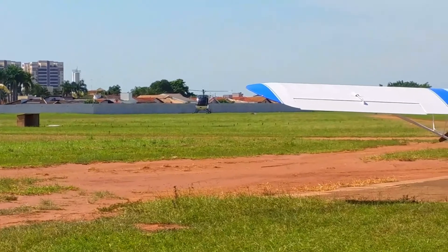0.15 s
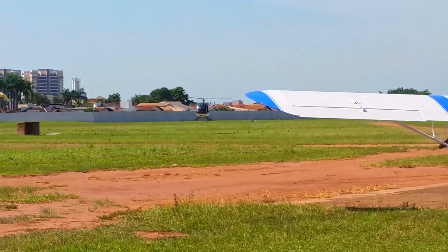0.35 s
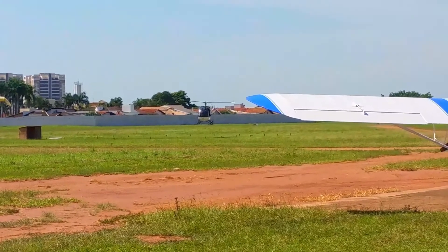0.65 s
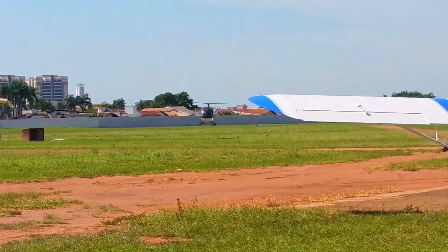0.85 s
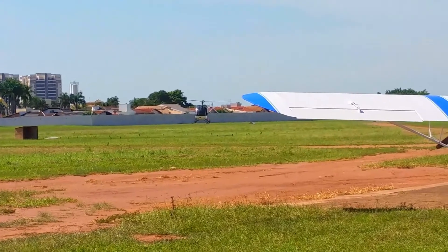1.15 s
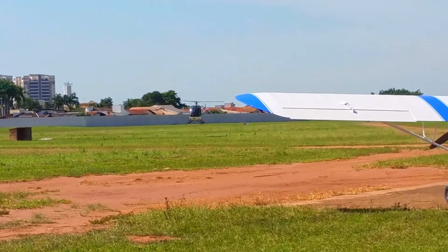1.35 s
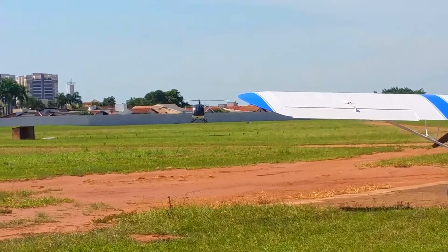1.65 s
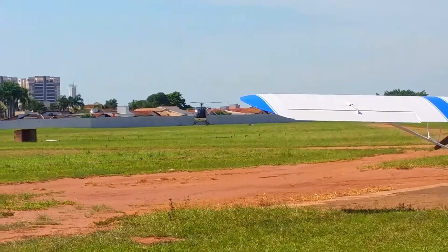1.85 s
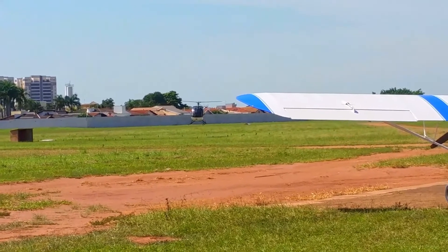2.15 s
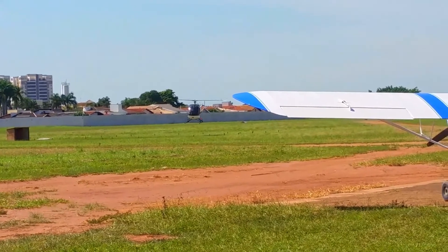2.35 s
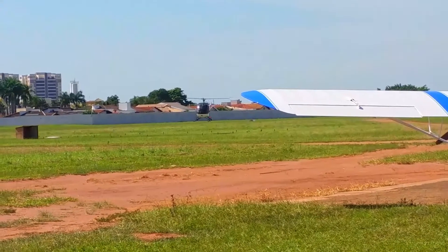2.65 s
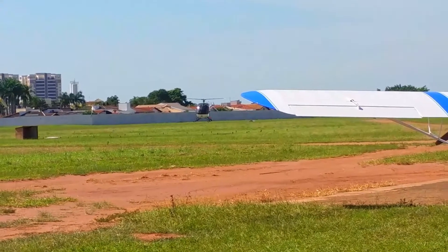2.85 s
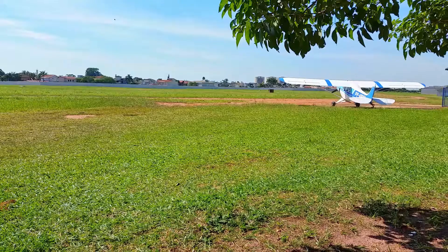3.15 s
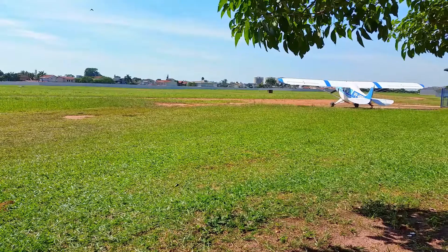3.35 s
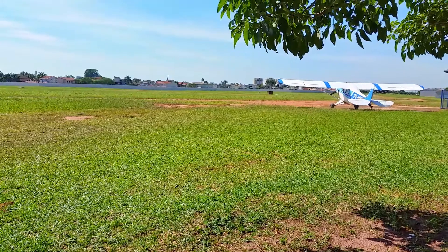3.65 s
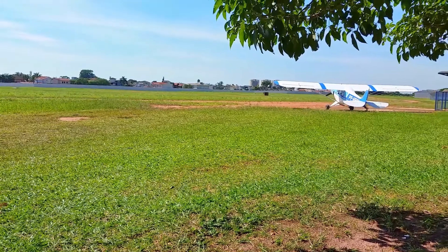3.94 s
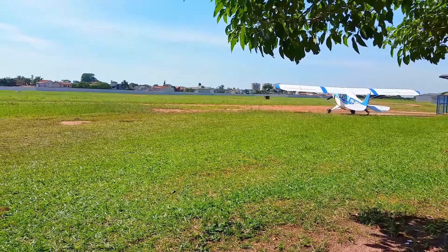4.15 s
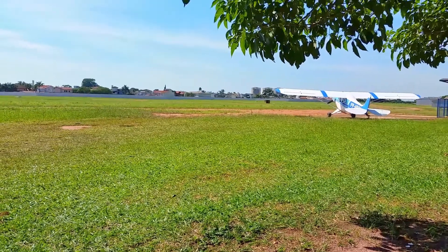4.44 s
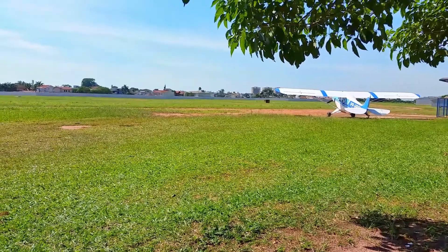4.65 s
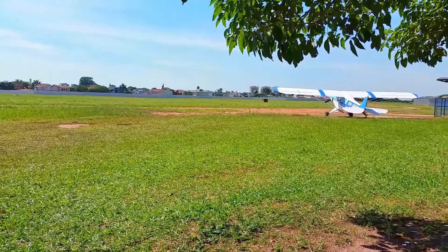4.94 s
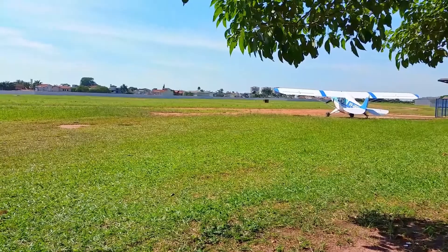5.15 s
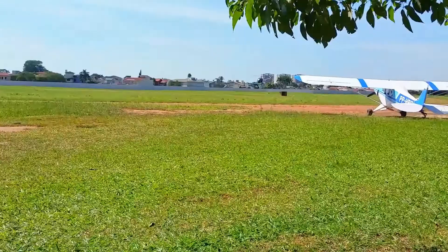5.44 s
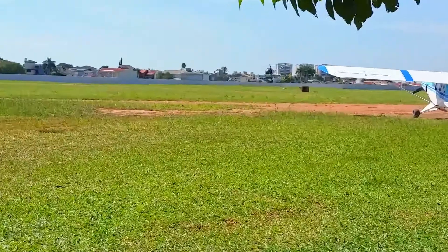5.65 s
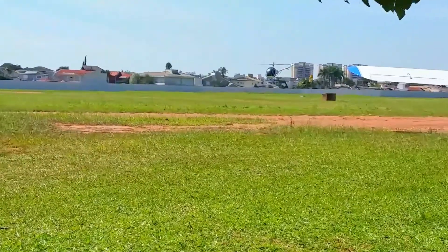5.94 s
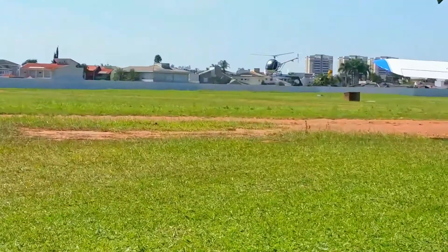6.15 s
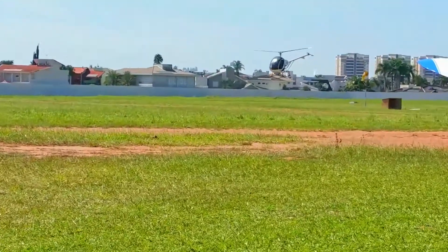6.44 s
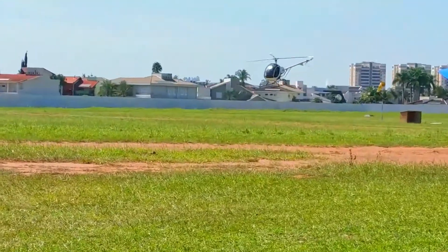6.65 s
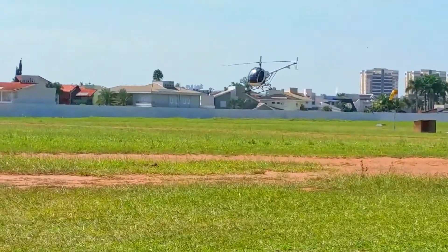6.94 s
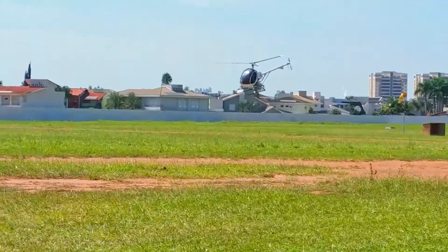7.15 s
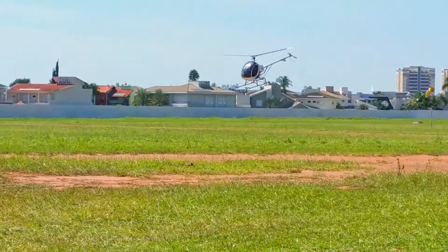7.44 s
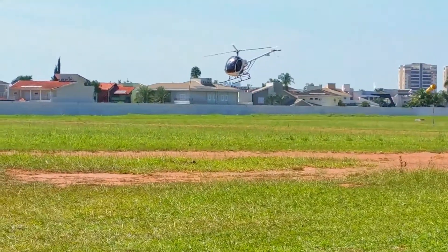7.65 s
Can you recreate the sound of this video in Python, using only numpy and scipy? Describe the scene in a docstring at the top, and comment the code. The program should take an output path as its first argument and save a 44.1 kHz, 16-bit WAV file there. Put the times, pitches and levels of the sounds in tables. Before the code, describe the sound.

From 0 to about 3.1 seconds, a small piston helicopter hovers far across an open airfield. A low, steady engine drone beats against a smooth tail-rotor hum; rapid main-blade slaps, around twenty-three a second, knock dully and are strongest near 0.8-1.2 seconds. Chopped air swishes softly above a wide low rumble, and small birds give faint short chirps, some raspy. At 3.1 the sound cuts off abruptly, leaving silence until 3.4. Then the helicopter fades in by 3.7, closer and rougher, with a bright initial surge: dense exhaust barks, crackling gas and thin high ringing over the drone. It eases around 4.5, then grows from 5.2 onward, with treble flares near 5.3, 6.0, 6.2 and 7.4. Deep tones swell separately, hiss flutters, and a few faint chirp-like blips appear. It remains loud to the end near 7.8, without fading away.

```python
"""A deep beating drone with slapping blades: a light piston helicopter hovers far across an airfield.
Four-cylinder exhaust lines beat against the tail rotor's hum, three main blades slap and swish as filtered
clicks and gated noise, wake noise rumbles low, and small birds chirp faintly as gliding sines.
The hover is cut off; after a short silence the climb fades in, closer to the microphone, and the exhaust
barks: coloured clicks and crackling noise at every firing, with high ringing lines and treble flares."""
import sys
import numpy as np
from scipy import signal
from scipy.fft import rfft, irfft
from scipy.io import wavfile
from scipy.ndimage import uniform_filter1d

SR = 44100
rng = np.random.default_rng(int(sys.argv[2]) if len(sys.argv) > 2 else 0)


def wrap_up_sound(samples):
    """Save the sound to the file named by the first command line argument, as 16-bit audio."""
    columns = np.atleast_2d(samples).T
    # keep every value between -1 and 1, then stretch to whole-number steps
    tamed = np.clip(columns, -1, 1)
    steps = np.round(tamed * 32767).astype(np.int16)
    wavfile.write(sys.argv[1], SR, steps)


N = 343980
TIME = np.arange(N) / SR
HZ = np.fft.rfftfreq(N, 1 / SR)
SIDES = np.array([[1], [-1]])  # left, right
# blade passes per firing, set by the gearing
TAIL_GEAR, MAIN_GEAR = 1.1359, 0.2592

# Cylinders in firing order: knock level/dB, knock lateness/firing periods, snap level/dB,
# snap delay/firing periods, gas puff level/dB
CYLINDERS = [(5.2, -.035, -6, .2, 2.5), (-.5, -.09, -1, .15, 1.5), (2, -.06, 2, .19, -3),
             (3.5, -.02, -6, .25, 0)]
# Exhaust lines against the overtone level: multiple of the four-stroke cycle (rounded when used),
# hover level/dB, climb level/dB
EXHAUST_LINES = [(2, -9.5, -16), (3, -2.5, -7.5), (5, -7, -32), (6, -9, -9), (7, 5, -0.5), (9, -14, -17),
                 (10, -7, -36), (11, -3.5, -4), (11.6, -3, -3), (13, -18.5, -43), (14, -23, -40),
                 (15, -13, -6), (16, -16, -10.5), (17, -32, -10.5), (18, -20.5, -7), (19, -27, -6),
                 (20, -28, -12), (21, -31, -11), (22, -39, -14.5), (23, -35, -22), (24, -24.5, -15.5)]


def undb(db):
    """Decibels to gain."""
    return 10 ** (np.asarray(db) / 20)


def level(x, db):
    """Scale the middle of the stereo image to rms 1, then apply a fixed or moving level in dB."""
    return x * undb(db) / np.sqrt(np.mean(np.atleast_2d(x).mean(axis=0) ** 2))


def curve(points):
    """(s, value) points joined sample by sample."""
    return np.interp(TIME, *np.transpose(points))


def swell(s, width_s):
    """A smooth rise to 1 and fall around one moment."""
    return np.exp(-((TIME - s) / width_s) ** 2)


def spectrum(points):
    """(Hz, dB) points joined on a log-frequency axis."""
    hz, db = np.transpose(points)
    return np.interp(np.log(HZ + 1), np.log(hz), db)


def colour(x, points):
    """Causal minimum-phase filter with the given spectrum, so that pulses ring after they strike."""
    cepstrum = irfft(np.log(undb(spectrum(points))), N)
    cepstrum[1:N // 2] *= 2
    cepstrum[N // 2 + 1:] = 0
    return irfft(rfft(x) * np.exp(rfft(cepstrum)), N)


def bell_band(bins, centre_hz, width_hz):
    """A bell-shaped band cut from a spectrum."""
    return irfft(bins * np.exp(-((HZ - centre_hz) / width_hz) ** 2), N)


def walk(rate):
    """Random levels held 1 / rate s and slewed twice; spread near 1."""
    k = int(SR / rate)
    held = rng.standard_normal(1024)[np.arange(N) // k % 1024]
    return np.sqrt(2) * uniform_filter1d(uniform_filter1d(held, k), k)


def noise(wide_hz):
    """Stereo noise, alike left and right in the bass and increasingly unrelated above wide_hz."""
    side = irfft(rfft(rng.standard_normal(N)) * HZ / np.hypot(HZ, wide_hz), N)
    return rng.standard_normal(N) + SIDES * side


def shafts(speed, starts):
    """Running count of firings, tail blade passes and main blade passes, geared to one engine."""
    turns = np.cumsum(curve(speed)) / SR
    gears = (1, TAIL_GEAR, MAIN_GEAR)
    return [gear * (turns - np.interp(s, TIME, turns)) for gear, s in zip(gears, starts)]


def pulses(turns, size):
    """One click each time the count passes a whole number; rms 1."""
    return level(np.diff(np.floor(turns), prepend=np.floor(turns[0])) * size, 0)


def each_pass(turns, scatter_db):
    """A random strength that holds for one firing or blade pass."""
    return undb(scatter_db * rng.standard_normal(1024)[np.floor(turns).astype(int) % 1024])


def cylinder_pulses(firings, dbs, lateness, scatter_db):
    """One click per firing; each cylinder has its own strength and lateness."""
    which = np.round(firings).astype(int) % len(CYLINDERS)
    return pulses(firings - lateness[which], undb(dbs[which]) * each_pass(firings + .5, scatter_db))


def blade_gate(blades, width):
    """A smooth swell around each blade pass; width in blade periods."""
    return np.exp(-(np.sin(np.pi * blades) / (np.pi * width)) ** 2 / 2)


def drone(firings, firing_db, octave_db, overtone_db, lines, pipe_q):
    """Exhaust lines; the pipe resonates at twice the firing rate, so lower lines lead and higher ones lag."""
    count = len(CYLINDERS)
    pipe = 2 * count
    tones = [(count, firing_db), (pipe, octave_db)]
    for k, db in lines:
        # uneven combustion roughens each of these lines
        roughness_db = 1.2 * walk(5) + 1.2 * walk(30)
        tones.append((k, overtone_db + db + roughness_db))
    out = 0
    for k, db in tones:
        # lines between the firing harmonics come from unequal cylinders and fall out of step
        stray = 1.9 * rng.standard_normal() * (k % count > 0)
        lag = np.arctan(pipe_q * (k / pipe - pipe / k))
        out = out + undb(db) * np.cos(2 * np.pi * k * firings / count - lag + stray)
    return np.sqrt(2) * out


def tail_rotor(blades, hum_db, overtone_db):
    """A clean hum: harmonics locked to the tail blade rate."""
    # Harmonics against the hum level: multiple of the tail blade rate, level/dB
    harmonics = [(1, 1.5), (2, -2), (3, -17), (4, -30), (5, -35)]
    hum = 0
    for k, db in harmonics:
        hum = hum + undb(db + overtone_db * (k > 1)) * np.cos(2 * np.pi * k * blades)
    return np.sqrt(2) * undb(hum_db) * hum


def far_knock(firings):
    """From far off only a dull knock of each firing is left."""
    # Spectrum of the distant knock: f/Hz, level/dB
    dull_spectrum = [(350, -30), (520, -3), (680, 0), (830, -6), (950, -18), (1200, -9), (1600, -22),
                     (4000, -45)]
    # Level of the distant knock: t/s, level/dB
    knock_level = [(0, -50), (1.2, -53), (1.65, -45.5), (2, -48), (2.4, -45), (3.05, -49)]
    knock_db, late = np.transpose(CYLINDERS)[:2]
    knocks = cylinder_pulses(firings, knock_db, late, scatter_db=3)
    return level(colour(knocks, dull_spectrum), curve(knock_level))


def blade_slap(blades, width, scatter_db):
    """Each main blade strikes the vortex of the one before: a clean knock, then a short rush."""
    # Spectrum of the slap: f/Hz, level/dB
    slap_spectrum = [(380, -37), (470, -10.5), (540, 8), (660, 11.5), (800, 1), (930, -25.5), (1100, -2.5),
                     (1280, -11.5), (1450, -16), (1600, -34.5), (2500, -51), (8000, -90.5)]
    # How hard the blades strike their own wake: t/s, level/dB
    slap_level = [(0, -49.5), (.4, -49), (.68, -46.5), (.8, -41.5), (1.05, -42), (1.4, -44.5), (1.7, -49),
                  (2.1, -46), (2.5, -52), (3.05, -54)]
    # The strike point slides round the rotor disc: t/s, lateness/blade periods
    slap_lateness = [(0, .02), (.5, -.02), (.9, -.042), (1.35, -.035), (2, .005), (3.05, .045)]
    blades = blades - curve(slap_lateness)
    strength = each_pass(blades + .5, scatter_db)
    knock = pulses(blades, strength)
    rush = blade_gate(blades - .07, width) * strength * noise(wide_hz=2500)
    return level(colour(knock + level(rush, -9), slap_spectrum), curve(slap_level))


def blade_whips(blades):
    """A passing blade tip throws bursts of hiss around its slap that come and go as the wake shifts."""
    # Bursts: lateness/blade periods, length/blade periods, centre f/Hz, half width/Hz,
    # strongest at t/s, half width/s, level/dB
    whips = [(-.22, .055, 1230, 250, .1, .45, -46), (.07, .06, 1220, 220, .15, .3, -50),
             (.07, .055, 1220, 220, .95, .35, -48.5), (-.23, .06, 680, 170, .9, 1.2, -49.5),
             (-.22, .055, 1950, 550, 2, .9, -51.5), (.05, .08, 1250, 250, 2.2, .15, -51),
             (.11, .09, 2050, 400, 2.7, .7, -49.5), (-.06, .035, 2000, 450, 2.93, .2, -45),
             (-.08, .06, 750, 350, 2.92, .15, -49)]
    out, air = 0, rfft(noise(wide_hz=2500))
    for late, length, centre_hz, width_hz, s, width_s, db in whips:
        hiss = bell_band(air, centre_hz, width_hz)
        strength = each_pass(blades - late + .5, scatter_db=1.5)
        burst = blade_gate(blades - late, length) * strength
        out = out + level(burst * hiss, db) * swell(s, width_s)
    return out


def blade_swish(firings, tail, main):
    """Both rotors and the exhaust chop the rushing air."""
    # Spectrum of the swish: f/Hz, level/dB
    swish_spectrum = [(300, -14.5), (470, -5.5), (660, 1), (950, -1), (1250, 4), (1560, -5), (1850, 1.5),
                      (2250, 0.5), (3000, -9.5), (3800, -17), (4800, -14.5), (6000, -25.5), (7200, -39.5),
                      (10000, -52), (15000, -36)]
    # Level of the swish: t/s, level/dB
    swish_level = [(0, -41.5), (.35, -43), (1.4, -44.5), (3.05, -43.5)]
    chop = 1 + 0.47 * blade_gate(main + 0.13, width=0.2)  # swells ahead of the main blade's pass
    chop = chop + .5 * blade_gate(tail / 2, width=0.071)  # every second tail blade
    chop = chop + .5 * blade_gate(firings - .15, width=0.088)
    chop = chop / uniform_filter1d(chop, size=SR // 2)
    return level(colour(chop * noise(wide_hz=1600), swish_spectrum), curve(swish_level))


def downwash(db):
    """Low turbulent rumble of the rotor wake: wide, slowly swelling noise."""
    # Spectrum of the wake: f/Hz, level/dB
    wash_spectrum = [(12, -28.5), (25, -18), (45, -5), (75, 0), (130, -5.5), (200, -5), (300, -10.5),
                     (450, -20.5), (700, -19), (2000, -64)]
    air = rng.standard_normal(N) + 0.41 * SIDES * rng.standard_normal(N)
    swell_db = .7 * walk(5)
    return level(colour(air, wash_spectrum), db + swell_db)


def birds(gain_db):
    """Short glides, rasping or pure, smeared by trees and buildings."""
    # Chirps: t/s, length/s, start f/Hz, end f/Hz, relative level/dB, rasp/share of the pitch
    chirps = [(0, 0.065, 3480, 3200, -46, .06), (.065, 0.065, 6250, 5500, -58, .005),
              (.182, 0.069, 4000, 3880, -52, .012), (.255, .04, 4770, 4650, -56, 0.0072),
              (.704, .073, 3820, 4330, -56, .04), (.904, .1, 4670, 3240, -52.5, .075),
              (1.265, .06, 6000, 5700, -61, .006), (1.31, 0.036, 5700, 6350, -62, .008),
              (1.376, 0.048, 6100, 5600, -55, 0.0088), (1.42, 0.039, 5750, 6300, -64, .008),
              (1.587, .06, 3960, 3880, -52, .012), (1.635, 0.046, 3250, 3020, -53.5, .03),
              (1.862, 0.052, 4100, 4500, -52, .04), (1.89, 0.09, 3570, 3100, -50.5, .07),
              (2.437, .098, 4500, 3420, -54.5, .08)]
    song, waver = np.zeros(N), walk(900)
    for s, length, start_hz, end_hz, db, rasp in chirps:
        inside = (TIME >= s) & (TIME < s + length)
        along = (TIME[inside] - s) / length
        hz = (start_hz + (end_hz - start_hz) * along) * (1 + rasp * waver[inside])
        tone = np.sin(2 * np.pi * np.cumsum(hz) / SR)
        song[inside] += undb(db + gain_db) * np.sin(np.pi * along) * tone
    echo = rng.standard_normal((2, SR // 4)) * np.exp(-TIME[:SR // 4] / 0.0067)
    echo = echo / np.linalg.norm(echo[0])
    return .7 * (song + signal.fftconvolve(song[None], echo)[:, :N])


def hover():
    """Far and low over the grass: deep beating tones, blade slap and a dull swish."""
    # Engine speed as heard: t/s, firing rate f/Hz
    hover_speed = [(0, 88.65), (1, 88.75), (2, 88.57), (3.07, 88.89)]
    # first pass of the loudest cylinder, a tail blade and a main blade (s)
    firings, tail, main = shafts(hover_speed, starts=(.0342, .0073, .0195))
    # as it hangs there the octave slowly gains and the overtones slowly fade (dB per s)
    octave_db = -24.5 + 0.47 * TIME
    overtone_db = -39.5 - 0.27 * TIME
    lines = [(round(k), db) for k, db, _ in EXHAUST_LINES]
    engine = drone(firings, -27, octave_db, overtone_db, lines, pipe_q=2.7)
    tones = engine + tail_rotor(tail, -26.5, overtone_db=-2.0)
    tones = tones * undb(.25 * SIDES)
    blades = blade_slap(main, width=.05, scatter_db=.6) + blade_whips(main)
    air = blade_swish(firings, tail, main) + downwash(db=-38.5)
    left, right = tones + far_knock(firings) + blades + air + birds(gain_db=3.5)
    # it hovers a little to the left, so the right port hears it two samples later
    return np.stack([left, np.roll(right, 2)])


def throb(firings, tail, db):
    """The exhaust line just under the tail rotor's octave beats with it about twice a second."""
    turns = 9 * firings / len(CYLINDERS)
    turns = turns + np.interp(4.14, TIME, 2 * tail - turns)  # one crest falls at 4.14 s
    return np.sqrt(2) * undb(db) * np.cos(2 * np.pi * turns)


def pipe_ringing(firings, closeness, gain_db, waver_db):
    """High lines of the exhaust pipe; each wavers and reaches the two ports slightly out of step."""
    # High lines before the common gain: multiple of the cycle, level/dB at closeness 0, level/dB at closeness 1
    ringing = [(29, -53, -44), (35, -53, -50), (38, -54, -52), (39, -46, -53), (42, -51, -43),
               (43, -49, -46), (48, -53, -48), (49, -55, -47), (52, -49, -53), (56, -52, -45),
               (57, -51, -42), (58, -57, -45), (60, -55, -48), (64, -62, -48), (65, -62, -48),
               (73, -62, -47), (76, -64, -45), (77, -60, -42), (78, -55, -46), (81, -60, -44),
               (84, -60, -47), (85, -60, -47), (88, -61, -47), (92, -57, -47), (94, -57, -47),
               (96, -53, -48), (100, -53, -50)]
    out = 0
    for k, far_db, close_db in ringing:
        phase, spread = rng.standard_normal(2) * (.85, .4)
        gain = undb(far_db + (close_db - far_db) * closeness + gain_db + waver_db * walk(8))
        out = out + gain * np.cos(2 * np.pi * k * firings / len(CYLINDERS) + phase + SIDES * spread)
    return np.sqrt(2) * out


def exhaust_bark(firings):
    """Each firing knocks, snaps some two milliseconds later, and lets out a crackling puff of gas."""
    # Spectrum of the knock as an exhaust valve opens: f/Hz, level/dB
    knock_spectrum = [(500, 1), (1800, 0), (2600, -2), (4000, -9), (8000, -15), (12000, -22)]
    # Spectrum of the snap that follows it: f/Hz, level/dB
    snap_spectrum = [(500, -1), (1200, -1), (2400, -3), (4000, 0), (7000, 0), (12000, -2)]
    knock_db, late, snap_db, delay, puff_db = np.transpose(CYLINDERS)
    knock = cylinder_pulses(firings + .003 * walk(60), knock_db, late, scatter_db=1)
    knock = colour(knock, knock_spectrum)
    # the pipe smears each knock: its treble leaves later than its bass
    smear_s_per_hz = 5e-7
    knock = irfft(rfft(knock) * np.exp(-1j * np.pi * smear_s_per_hz * HZ ** 2), N)
    snap = cylinder_pulses(firings + .006 * walk(60), snap_db, delay, scatter_db=3)
    snap = colour(snap, snap_spectrum)
    age = firings % 1  # firing periods since the last firing
    which = np.floor(firings).astype(int) % len(CYLINDERS)
    strength = undb(puff_db[which]) * each_pass(firings, scatter_db=1.5)
    envelope = np.exp(-age / .33) * (1 - np.exp(-age / .13))
    crackle = undb(3 * walk(1500))
    puff = strength * envelope * crackle * noise(wide_hz=4300)
    steady = level(noise(wide_hz=1680), -.5)
    return knock + undb(-6) * snap + level(puff, 0) + steady


def over_ground(x, closeness):
    """The reflection from the field cuts dips that fill in as the helicopter rises."""
    # Ground colouring while far and low: f/Hz, level/dB
    ground_dips = [(450, -10), (600, -8.5), (760, 0), (880, 4), (1250, 1), (1480, -2), (1660, -8),
                   (1800, -5.5), (2100, -1), (2800, 1)]
    return closeness * x + (1 - closeness) * colour(x, ground_dips)


def shimmer(x):
    """Turbulent air swells and fades quarter octaves from 1 kHz up separately; all below moves as one."""
    centres_hz = 1000 * 2 ** (np.arange(16) / 4)
    bins = rfft(x)
    out = 0
    for only in np.eye(len(centres_hz)):
        band = irfft(bins * np.interp(HZ, centres_hz, only), N)
        out = out + band * undb(1.5 * walk(7))
    return out


def through_air(x, band_dbs):
    """Distance, ground and turbulence swell and fade five broad overlapping bands separately."""
    # Band edges: f/Hz
    edges_hz = (400, 1500, 2800, 5400, 7500, 20000)
    # half-octave crossfades at the edges
    above = [np.clip(.5 + 2 * np.log2((HZ + 1) / hz), 0, 1) for hz in edges_hz]
    bins = rfft(x)
    out = 0
    for lower, upper, db in zip(above, above[1:], band_dbs):
        out = out + level(irfft(bins * (lower - upper), N), db)
    return out


def hiss_swells_and_chirps(x):
    """A hissing band near 4.2 kHz swells now and then; its three briefest boosts are faint bird-like chirps."""
    # Boosts of the band, the briefest heard as chirps: t/s, half width/s, boost/dB
    boosts = [(3.75, 0.14, 1.9), (4.25, 0.025, 6), (5.17, 0.11, 3.5), (5.385, .025, 7.2), (7.15, 0.35, 3.3),
              (7.31, .03, 6.6)]
    band = bell_band(rfft(x), centre_hz=4200, width_hz=450)
    boost_db = sum(db * swell(s, width_s) for s, width_s, db in boosts)
    return x + band * (undb(boost_db) - 1)


def microphone_ports(x):
    """The microphone's body shades the treble from the right port."""
    # Difference between the ports: f/Hz, left minus right level/dB
    port_difference = [(200, -4), (600, -1), (1060, 3), (1880, -3), (2600, -5), (3500, 3.5), (5900, 2.5),
                       (10000, 8.5), (14000, 0)]
    return irfft(rfft(x) * undb(SIDES * spectrum(port_difference) / 2), N)


def air_band_levels(near_db, surge_db):
    """Levels of bark, rasp, fizz, sizzle and top hiss as the helicopter nears and the treble flares."""
    # Bands before the bark's overall trim: level/dB at 0 dB approach, growth/dB per dB of approach,
    # share of a treble flare/0-1
    air_bands = [(-26.5, 1.08, 0), (-27, 1.02, 0.1), (-35.5, 0.88, 0.37), (-41, 1.66, 0.86),
                 (-49.5, 1.23, 1)]
    # Brief flares of the treble before each band's share: t/s, half width/s, height/dB
    flares = [(3.71, 0.05, 6), (4.0, 0.037, 1.5), (5.27, 0.27, 6.5), (5.99, 0.15, 8), (6.24, 0.11, 7),
              (7.44, 0.19, 7)]
    flare_db = sum(db * swell(s, width_s) for s, width_s, db in flares)
    band_dbs = []
    for band, (db, growth, share) in enumerate(air_bands):
        surge_share = 0.2 if band else 1  # the lowest band takes the whole surge
        band_dbs.append(db + growth * near_db + share * flare_db + surge_share * surge_db)
    return band_dbs


def climb():
    """Closer and rising: the exhaust barks over the drone, louder and brighter as it nears."""
    # Engine speed as heard: t/s, firing rate f/Hz
    climb_speed = [(3.4, 88.42), (4.2, 89.26), (5, 89.52), (5.8, 90.04), (6.4, 90.17), (7, 90.68),
                   (7.8, 90.56)]
    # How strongly it comes across the field as it nears and rises: t/s, approach/dB
    approach = [(3.9, -7), (4.4, -8), (5.2, -7.5), (5.65, -3), (6.3, -3), (6.75, -1), (7.4, -0.5)]
    # The three deep tones swell and fade separately. Firing tone: t/s, level/dB
    firing_level = [(4, -28.5), (4.5, -40), (5, -28.5), (5.5, -23), (6.7, -33.5), (7.5, -21.5)]
    # Its octave: t/s, level/dB
    octave_level = [(3.6, -21), (4.05, -18.5), (4.5, -24.5), (4.75, -30), (5.1, -22), (6.15, -24),
                    (6.5, -21), (7, -22), (7.55, -18)]
    # Tail rotor hum before its harmonic levels: t/s, level/dB
    tail_level = [(4, -32), (5.1, -30), (5.75, -32), (6.25, -31), (6.6, -31), (7.2, -28.5), (7.7, -49)]
    # Exhaust lines above cycle multiple 13, before trim and line levels: t/s, level/dB
    upper_level = [(3.7, -32.5), (4.09, -36), (4.94, -37), (6.49, -34), (6.83, -30), (7.8, -28.5)]
    # Spectrum of the bark before the air bands are levelled: f/Hz, level/dB
    bark_spectrum = [(320, -29.5), (540, 2.5), (575, -6), (652, 3), (712, -5), (1270, -1), (1570, 1),
                     (1790, 7.5), (2150, 5.5), (2420, 2.5), (2810, -7), (3300, -9.5), (4200, -8),
                     (5100, -15), (6750, -22), (7500, -35.5), (8200, -34.5), (9200, -28.5), (10500, -33.5),
                     (11400, -47.5), (14200, -46), (22000, -120)]
    # first pass of the loudest cylinder, a tail blade and a main blade (s)
    firings, tail, main = shafts(climb_speed, starts=(3.436, 3.4005, 3.428))
    near_db = curve(approach)
    closeness = 1 - near_db / near_db.min()
    # one broad swell of bark, overtones and ringing as the climb begins
    surge_db = 5.5 * swell(3.625, width_s=0.31)
    overtone_db = -31 + 0.33 * near_db + 0.27 * surge_db
    # the ground swallows less of the upper lines as the helicopter rises
    upper_db = curve(upper_level) - overtone_db - 0.7
    lines = [(round(k), db + upper_db * (round(k) > 13)) for k, _, db in EXHAUST_LINES]
    engine = drone(firings, curve(firing_level), curve(octave_level), overtone_db, lines, pipe_q=3.0)
    engine = engine + throb(firings, tail, db=-39)
    engine = engine + pipe_ringing(firings, closeness, gain_db=-1.5 + .5 * surge_db, waver_db=3)
    # the bark swells a little with each main blade pass
    bark = exhaust_bark(firings) * (1 + 0.21 * blade_gate(main, width=0.34))
    bark = shimmer(over_ground(colour(bark, bark_spectrum), closeness))
    bark_and_chirps = hiss_swells_and_chirps(through_air(bark, air_band_levels(near_db, surge_db)))
    bark_and_chirps = undb(-2.0) * microphone_ports(bark_and_chirps)
    hum = tail_rotor(tail, curve(tail_level), overtone_db=0.0)
    return engine + hum + bark_and_chirps + downwash(db=-31.5)


def scene():
    """The hover is cut off; after a short silence the climb fades in."""
    cut_s, fade_from_s, fade_to_s = 3.07, 3.4, 3.722
    fade_out = np.clip((cut_s - TIME) / .005 + .5, 0, 1)
    fade_in = np.clip((TIME - fade_from_s) / (fade_to_s - fade_from_s), 0, 1)
    return hover() * np.sin(np.pi / 2 * fade_out) ** 2 + climb() * fade_in


def record(dry):
    """The microphone cuts the top: a steep low-pass at 15.8 kHz."""
    return signal.sosfilt(signal.ellip(8, .2, 70, 15800, fs=SR, output="sos"), dry)


dry = scene()
out = record(dry)
wrap_up_sound(out)
```